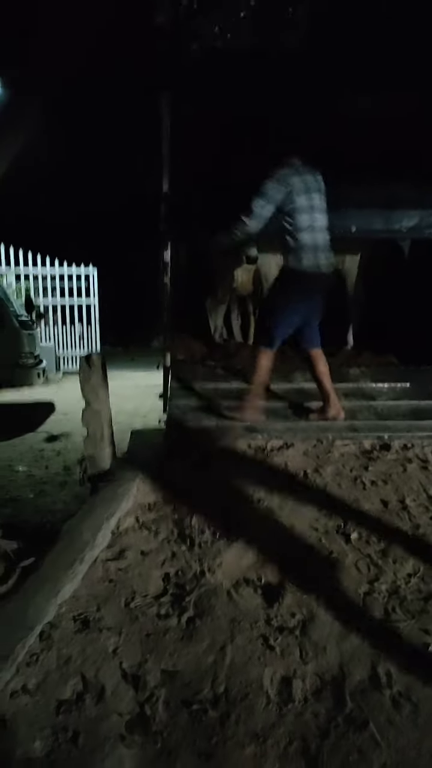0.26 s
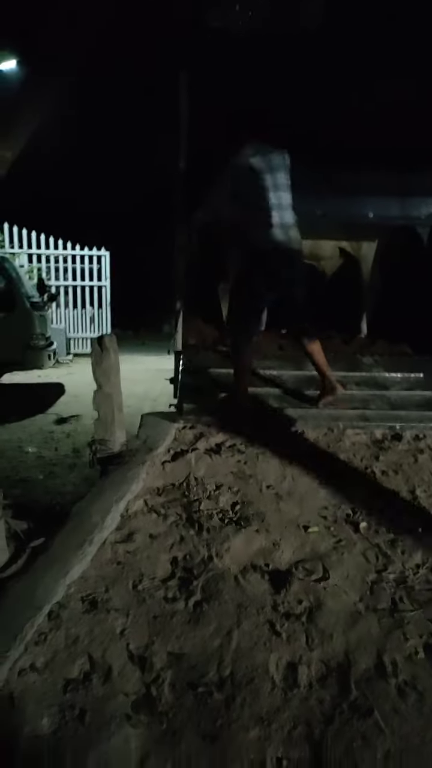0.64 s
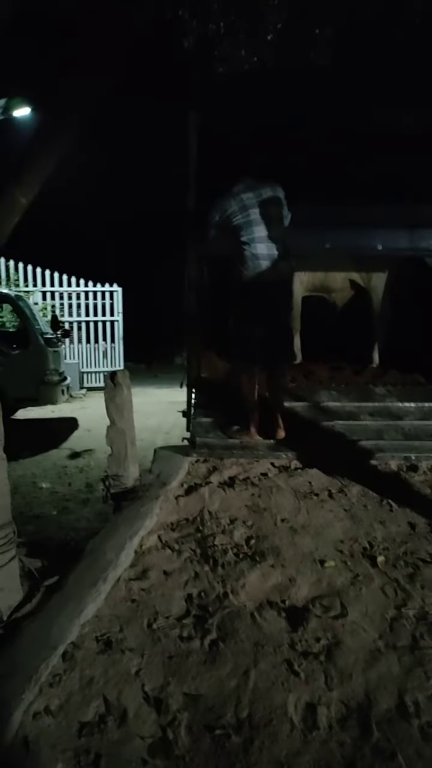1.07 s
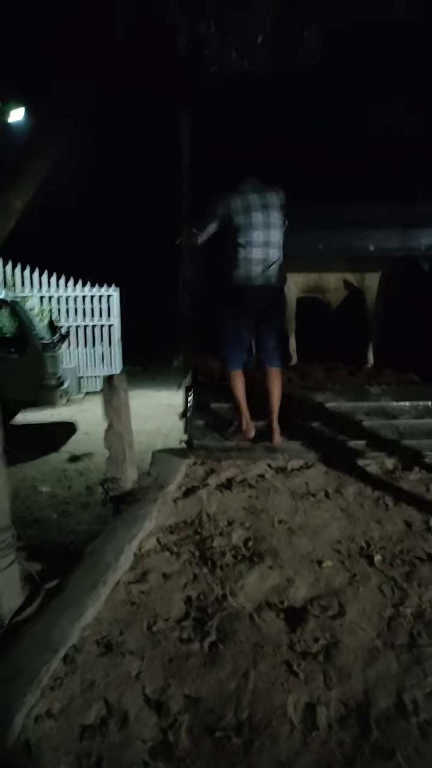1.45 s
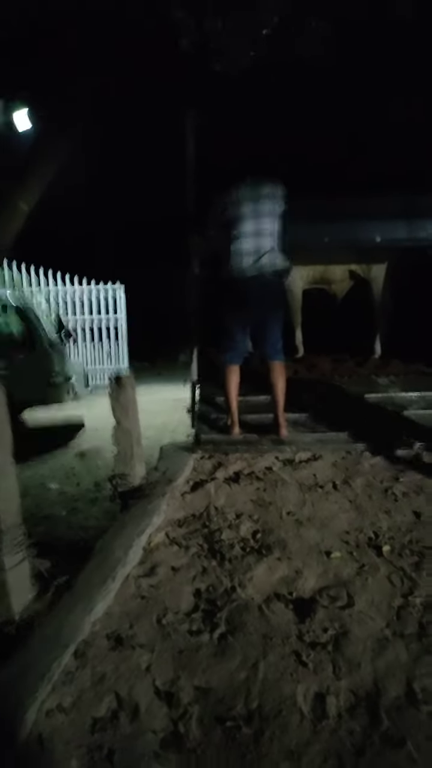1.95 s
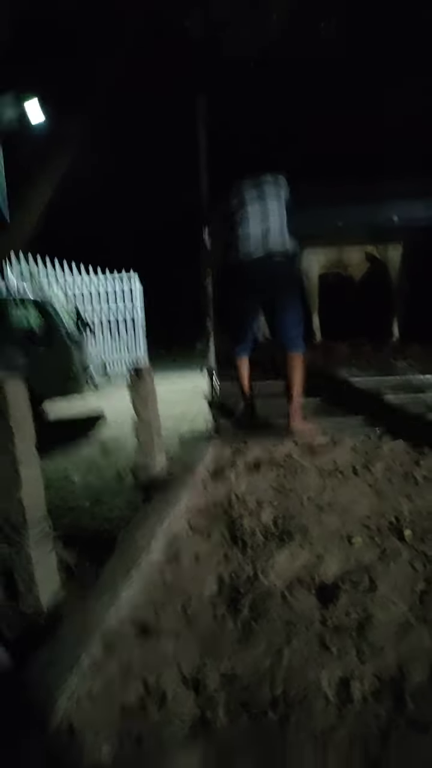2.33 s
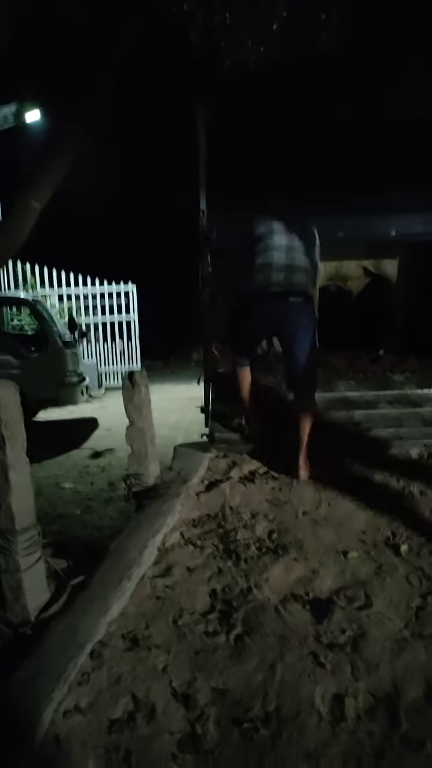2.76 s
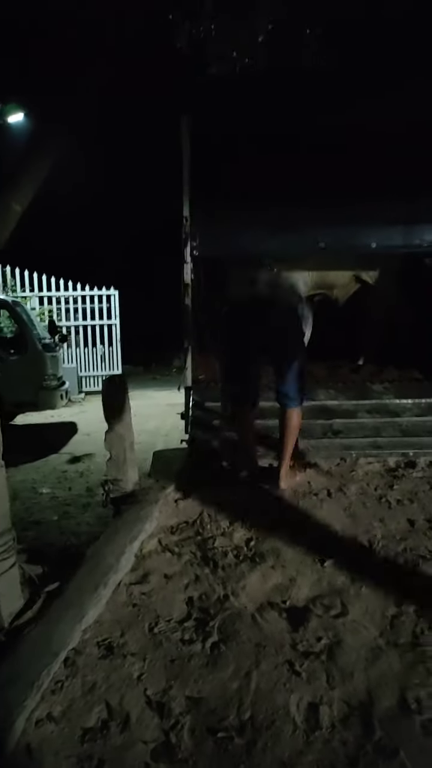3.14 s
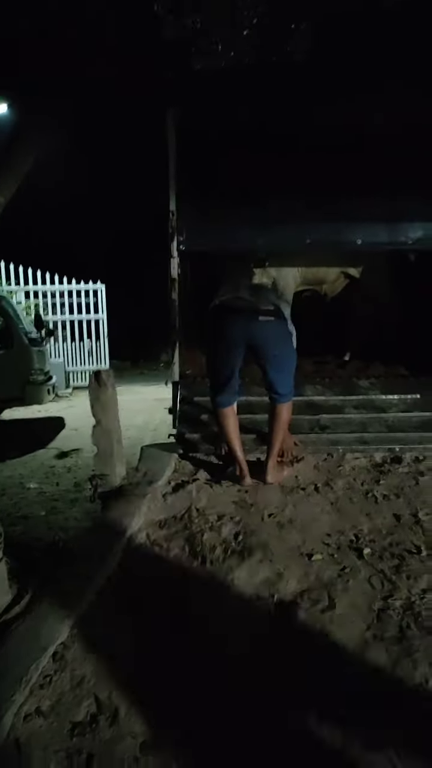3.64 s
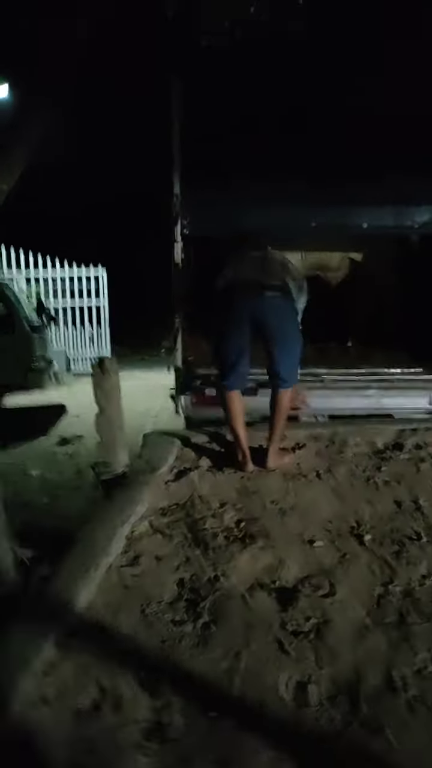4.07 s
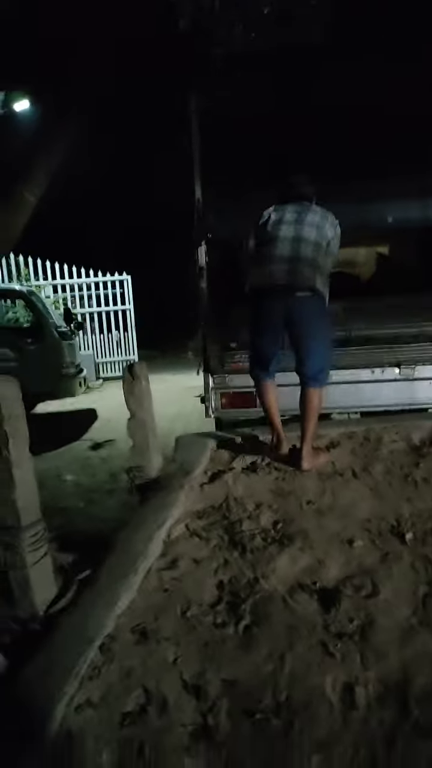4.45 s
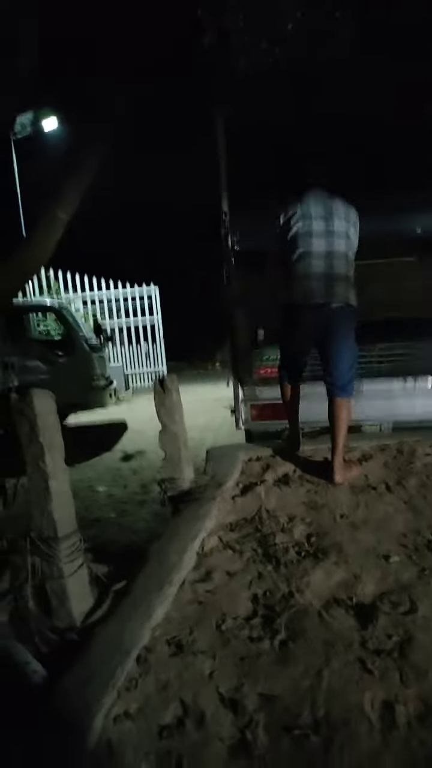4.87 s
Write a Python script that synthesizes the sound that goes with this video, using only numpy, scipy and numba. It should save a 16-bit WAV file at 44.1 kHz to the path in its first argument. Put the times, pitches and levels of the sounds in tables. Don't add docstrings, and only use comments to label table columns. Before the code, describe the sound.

A few metres away outdoors, hooves knock and drag on a truck's sheet-metal bed. Bangs at the ramp lead to a short squeak and two hard, ringing steel slams just before two seconds. The shaking dies away into sparse scuffs, a latch knock and a hollow thud, then loose bars rattle faster and brighter as the ramp rises. Faint engine hum; phone microphone with dull yard echo.

```python
import sys
import numpy as np
from scipy import signal
from scipy.fft import rfft, irfft
from scipy.io import wavfile
from scipy.ndimage import uniform_filter1d
from numba import njit

SR = 44100
rng = np.random.default_rng(int(sys.argv[2]) if len(sys.argv) > 2 else 0)


def magnitude_from_level(level_db):
    exponent = np.asarray(level_db, float) / 20
    return 10 ** exponent


def digitize_waveform(pressure):
    field = np.atleast_2d(pressure).T
    bounded = np.clip(field, -1, 1)
    quanta = np.round(bounded * 32767).astype(np.int16)
    wavfile.write(sys.argv[1], SR, quanta)


N = 225250
T = np.arange(N) / SR

# t/s, peak level/dB, ring t60/s, low ring share [0-3], clatter/s
BANGS = [
    (0.3855, -25.5, 0.21, 2.3, .004),
    (1.113, -28.5, 0.2, 2.9, 0.011),
    (3.7405, -36, 0.21, 0.66, .004),
    (1.7191, -16.5, 0.23, 1.34, 0.0019),
    (1.9125, -14.5, 0.26, 1.45, .004),
]
# f/Hz, share of ring time [0-3]
DECK_RING = [(300, 2.63), (900, 1.85), (2500, 0.74), (6000, 1.27), (13000, 1.05)]
BED_EVEN = 0.75


def on_log(table, hz):
    f, v = np.transpose(table)
    return np.interp(np.log(hz + 1e-9), np.log(f), v)


def coloured(gain):
    x = irfft(rfft(rng.standard_normal(N)) * gain, N)
    return x / np.std(x)


def walk(rate):
    k = int(SR / rate)
    levels = np.repeat(rng.standard_normal(N // k + 1), k)
    return 1.7 * uniform_filter1d(uniform_filter1d(levels, k), k)[:N]


@njit
def ring(hz, gain, t60, size):
    y = np.zeros(size)
    for k in range(len(hz)):
        p = np.exp(2j * np.pi * hz[k] / SR - np.log(1000.) / (t60[k] * SR))
        z = gain[k] + 0j
        for i in range(min(size, int(t60[k] * SR))):
            y[i] += z.imag
            z *= p
    return y


def add(out, x, s):
    i = int(s * SR)
    out[i:i + len(x)] += x[:N - i]


def strike(colour_db, t60, clatter_s, first, count=400):
    luck = rng.standard_normal((2, count))
    hz = 500 * (1 + 4.3 * (np.arange(count) + rng.random(count)) / count) ** 2
    gain = magnitude_from_level(colour_db(hz) + 5.5 * luck[0]) * hz ** .25 * np.exp(2j * np.pi * rng.random(count))
    modes = ring(hz, gain, np.clip(t60(hz) * np.exp(0.063 * luck[1]), .01, 1.2), SR)
    f, t, z = signal.stft(rng.standard_normal(SR), SR, nperseg=384)
    fade_db = colour_db(f)[:, None] - 60 * t / np.clip(t60(f), .01, 2)[:, None]
    dense = signal.istft(z * magnitude_from_level(fade_db), SR, nperseg=384)[1][:SR]
    start = SR // 40
    x = magnitude_from_level(-3.5) * modes / np.std(modes[:start]) + dense / np.std(dense[:start])
    t = T[:SR]
    crack = np.exp(-t / 0.019)
    x = x * magnitude_from_level(2.5 * crack + 1.78 * walk(210)[:SR] * (0.5 - crack))
    x = x * (1 - (1 - first) * np.exp(-t / clatter_s)) * np.minimum(t / 0.00032, 1)
    return x / np.std(x[:start])


def bangs():
    # f/Hz, level/dB per Hz
    ramp = [(180, -10), (300, -5), (370, -14), (591, -18), (914, -10.5), (1060, -13), (1220, -12),
            (2010, -11), (2530, -4), (3490, -4.5), (5660, -1), (7330, -12.5), (9180, -14.5), (11100, -28),
            (14200, -21)]
    sill = [(180, -11.5), (300, 5.5), (581, -31), (729, -11), (1020, -16), (1320, -40), (2150, 6.5),
            (2480, -8), (2690, 6.5), (5660, -1.5), (8890, -15), (9490, -24), (14200, -24)]
    latch = [(180, -36), (300, -7), (610, -29), (870, -13), (1410, -20), (1510, -9.5), (3430, -6),
             (4160, -6), (5480, -2), (10800, -15.5), (14200, -16)]
    gate = [(180, -44), (300, -18), (519, -29.5), (914, -12), (1200, -26.5), (1770, -1.5), (2330, -0.5),
            (2570, -6), (3320, -4), (4510, -15.5), (5140, -3), (5940, -9), (6340, -18.5), (7450, -12.5),
            (14200, -27.5)]
    rail = [(180, -29), (300, -16), (554, -31), (843, -2.5), (944, -8.5), (1020, -9.5), (1830, -6),
            (2330, -3), (3900, -8), (5220, -3.5), (5660, -5), (6230, -6.5), (9960, -12.5), (11000, -28.5),
            (14200, -9.5)]
    # f/Hz, level/dB, t60/s
    gate_modes = [(1736, 3, 0.11), (1920, -17, 0.3), (2290, -24, 0.1), (3270, -13, .14), (4890, -18, 0.26),
                  (4740, -3.5, 0.31), (5130, -2.5, .35), (5300, -28, 0.16), (5720, -7.5, 0.27),
                  (5240, -15, .1)]
    rail_modes = [(843, -14, 0.69), (1043, -15.5, 0.78), (2320, -7, 0.3), (3084, -0.5, 0.09),
                  (4630, -3, 0.23), (4780, -3, 0.26), (5820, 0, 0.25), (5860, -13, 0.28), (5980, -4, 0.25),
                  (6900, -9, 0.12), (7100, -6, .12)]
    sharp_s = .0045
    out = np.zeros(N)
    for (s, db, t60, low_share, clatter_s), part in zip(BANGS, (ramp, sill, latch, gate, rail)):
        colour_db = lambda hz: on_log(part, hz)
        lasts = lambda hz: t60 * on_log(DECK_RING, hz) * on_log([(900, low_share), (2500, 1.0)], hz)
        x = strike(colour_db, lasts, clatter_s, min(sharp_s / clatter_s, 1))
        add(out, magnitude_from_level(db - 6.0) * x, s)
    for bang, modes in zip(BANGS[-2:], (gate_modes, rail_modes)):
        hz, db, t60 = np.transpose(modes)
        gain = magnitude_from_level(db - 28) * np.exp(2j * np.pi * rng.random(len(hz)))
        add(out, ring(hz, gain, t60, SR), bang[0])
    return out


def on_deck(table, top_db, ring_s, clatter_s, first):
    # f/Hz, level/dB per Hz
    deck = [(180, -24.5), (300, -7), (563, -15.5), (706, -7), (1070, -8), (1320, -6.5), (2290, 4),
            (2920, -7), (5750, -5), (6340, -14), (14200, -42.5)]
    out = np.zeros(N)
    usual_db = np.mean([row[1] for row in table])
    top = top_db + 28.5
    for s, db, low, mid in table:
        t60 = ring_s + 0.02 * (db - usual_db)
        tilt = [(800, low + 13.5), (2300, mid - 4.5), (5500, 0), (11000, top), (13500, top + 12)]
        colour_db = lambda hz: on_log(deck, hz) + on_log(tilt, hz)
        lasts = lambda hz: t60 * on_log(DECK_RING, hz)
        add(out, magnitude_from_level(db - 9.5) * strike(colour_db, lasts, clatter_s, first), s)
    return out


def knocks():
    # t/s, peak level/dB, low body/dB, middle body/dB
    light_blows = [(0.096, -41.5, -2, 14), (0.1296, -40, -21, -9), (0.398, -37, -10.5, -3),
                   (0.7279, -34, -13, 3), (0.8365, -50.5, 6, 10), (0.9148, -46.5, -3, 6),
                   (1.0896, -37, -8.5, 2.5), (1.124, -34.5, -15.5, -3.5), (1.432, -42, -22, -15),
                   (2.7173, -43, -34, 8), (3.477, -46.5, -6.5, 5), (3.5003, -41.5, -40, -8),
                   (3.8295, -46, -44, -9), (4.4404, -45.5, 15, -10)]
    return on_deck(light_blows, top_db=-23.5, ring_s=.23, clatter_s=.004, first=.5)


def drags():
    # t/s, peak level/dB, low body/dB, middle body/dB
    dragged = [(0.0174, -46.5, -17, 4), (0.0503, -58, -17, -6), (0.152, -51.5, -20, -12),
               (1.1988, -45.5, 8, 12), (1.3257, -45, -10, -2), (1.3626, -44.5, -16, 5),
               (2.37, -45.5, -7, 4), (2.4395, -54, -11, -19), (2.706, -48, -21, 6), (2.78, -58, -20, 5),
               (2.9935, -45.5, -16, -3), (3.028, -49, -26, -1), (3.2997, -50, -16, 1.5),
               (3.9406, -54.5, -13, 6), (4.0647, -52, -10, 3), (4.1387, -51, 0, 14),
               (4.3166, -44, -7.5, 4.5)]
    return on_deck(dragged, top_db=-20.5, ring_s=0.35, clatter_s=.018, first=.1)


def rattles():
    # t/s, peak level/dB
    bars = [(4.5034, -48.5), (4.5535, -52.5), (4.572, -49), (4.64, -48), (4.6803, -66), (4.7284, -42),
            (4.8046, -37.5), (4.874, -37.5), (4.9626, -39.5), (4.9978, -39.5), (5.0563, -34.5)]
    table = [(s, db, -37, -13) for s, db in bars]
    return on_deck(table, top_db=-16, ring_s=0.14, clatter_s=.006, first=.3)


def thuds():
    # t/s, peak level/dB, f/Hz, t60/s
    frame = [(.39, -42, 384, 0.58), (.39, -53.5, 191, 1), (.735, -53.5, 336.2, 1), (1.118, -43, 353, 0.18),
             (1.15, -52.5, 252.3, 0.79), (1.725, -51, 281, 1), (1.92, -47, 326, 0.22),
             (2.03, -42, 197, 0.27), (2.722, -55, 2220, .12), (3.30, -50.5, 313, 0.06),
             (4.441, -39.5, 235.5, 0.18), (4.441, -47.5, 407, 0.042), (4.6, -60, 342, 0.8),
             (4.85, -60, 338.5, 1), (1.3, -53, 195.2, 0.55), (1.5, -54.5, 190, 0.4),
             (4.441, -40.5, 656, 0.09), (4.441, -49, 1490, 0.092)]
    # t/s, peak level/dB, f/Hz, t60/s
    grit = [(0.5602, -51, 5500, 0.027), (0.562, -55, 10500, .02), (2.3023, -36.5, 5270, 0.016),
            (3.741, -36, 13300, 0.03)]
    out = np.zeros(N)
    size = SR // 2
    for s, db, hz, t60 in list(frame) + list(grit):
        gain = magnitude_from_level(db) * np.array([1., 0.33 + 0j])
        x = ring(np.array([1., 1.04]) * hz, gain, np.full(2, max(t60, .005)), size)
        add(out, x * np.minimum(T[:size] * hz / 3.4, 1), s)
    return out


def hinge():
    # t/s, start pitch f/Hz, peak level/dB, octave relative level/dB, hold/s
    squeaks = [(1.499, 5500, -42, -10.5, 0.043), (1.653, 5100, -50.5, -24, 0.015)]
    attack_s, fade_db_per_s, octave_fade_db_per_s, sag_hz_per_s = 0.018, 298, 200, 860
    grip_hz, steady = 500, .95
    out = np.zeros(N)
    for s, hz, db, octave_db, hold_s in squeaks:
        t = np.maximum(T - s, 0)
        phase = 2 * np.pi * np.cumsum(hz - sag_hz_per_s * np.minimum(t, .5)) / SR
        level = db - fade_db_per_s * np.maximum(t - attack_s - hold_s, 0)
        rise = np.minimum(t / attack_s, 1) ** 2
        for order, shift_db in ((1, 0), (2, octave_db - octave_fade_db_per_s * t)):
            grip = steady + walk(grip_hz * order) + 1j * walk(grip_hz * order)
            out += magnitude_from_level(level + shift_db) * rise * (grip * np.exp(1j * order * phase)).real
    return out


def scrape():
    start_s, start_hz, climb_hz_per_s = 4.969, 2030, 2600
    peak_db, rise_s, fade_db_per_s = -56, 0.066, 63
    t = T - start_s
    phase = 2 * np.pi * np.cumsum(start_hz + climb_hz_per_s * np.maximum(t, -.5)) / SR
    grind = (walk(500) + 1j * walk(500)) * magnitude_from_level(1.7 * walk(40)) * np.exp(1j * phase)
    rise = np.exp(-(np.minimum(t, 0) / rise_s) ** 2)
    return magnitude_from_level(peak_db - fade_db_per_s * np.maximum(t, 0)) * rise * grind.real


def yard(x):
    t60_s, echo_db, damp_hz, delay_s = 0.93, -22, 5000, 0.027
    t = T[:SR]
    tail = rng.standard_normal(SR) * magnitude_from_level(-60 * t / t60_s) * (1 - np.exp(-t / delay_s))
    tail = signal.lfilter(*signal.butter(1, damp_hz, fs=SR), tail)
    return magnitude_from_level(echo_db) * signal.fftconvolve(x, tail / np.sqrt(np.sum(tail ** 2)))[:N]


def shudder(t60, even):
    out = np.zeros(N)
    loudest_db = max(row[1] for row in BANGS)
    rise = 1 - np.exp(-T / 0.061)
    for s, db, *_ in BANGS:
        add(out, magnitude_from_level(even * (db - loudest_db) - 60 * T / t60) * rise, s)
    return out


def night():
    # f/Hz, level/dB per Hz
    ground = [(59, -47), (100, -14), (127, 4.5), (155, -4.5), (246, 0), (649, -9), (724, -7.5),
              (794, -10.5), (2180, -9), (3200, -14), (5440, -8), (8000, -19), (10400, -19), (17600, -120)]
    treble = [(9500, -23), (10800, -33), (12000, -32.5), (14000, -26.5)]
    # t/s, level/dB
    stir = [(0, -54.5), (.23, -56.5), (.55, -54), (.73, -54), (.95, -59.5), (1.2, -52), (1.4, -55.5),
            (1.7, -43.5), (2.15, -56), (2.5, -62), (2.9, -59), (3.5, -59), (4.0, -58.5), (4.3, -55),
            (4.8, -55.5), (5.11, -55)]
    # rest level/dB, share of stir [0-1], shudder level/dB, shudder t60/s, ramp jingle level/dB
    regions = [
        (-4, 0.57, 13.5, 1.38, -7),
        (-1.5, 0.54, 22.5, 0.73, -16),
        (-2, 0.62, 21, 0.79, 15.5),
        (1, .5, 28, 0.66, 20.5),
    ]
    stir_db = np.interp(T, *np.transpose(stir)) + 57
    lift_db = 30.5 * (T - T[-1])
    swell = []
    for (rest_db, share, db, t60, jingle_db), even in zip(regions, (BED_EVEN, 1, 1, 1)):
        scuff = magnitude_from_level(rest_db + share * stir_db)
        shake = magnitude_from_level(db) * shudder(t60, even)
        jingle = magnitude_from_level(jingle_db + lift_db)
        swell.append(10 * np.log10(scuff ** 2 + shake ** 2 + jingle ** 2))
    f = np.fft.rfftfreq(N, 1 / SR)
    colour = magnitude_from_level(on_log(ground[:-2] + treble, f))
    colour /= np.sqrt(np.sum(colour[f > 90] ** 2))
    grit = walk(90)
    out = np.zeros(N)
    edges = np.geomspace(90, 15000, 30)
    for a, b in zip(edges, edges[1:]):
        gain = colour * (f >= a) * (f < b)
        place = np.interp(np.log(a), np.log([500, 1300, 2200, 4500, 6000, 9000]), [0, 1, 1, 2, 2, 3])
        weight = np.clip(1 - abs(place - np.arange(4)), 0, 1)
        db = weight @ np.array(swell) + 1.56 * walk(42) + grit * (1 - weight[0])
        out += np.sqrt(np.sum(gain ** 2)) * coloured(gain) * magnitude_from_level(db)
    return magnitude_from_level(-57.5) * out


def engine():
    # t/s, level/dB
    hum_levels = [(0.0, -62), (0.1, -98), (0.33, -57), (0.64, -62.5), (0.71, -83), (0.77, -71), (1.73, -76),
                  (1.75, -69), (3.39, -65), (3.68, -54), (4.15, -71), (4.21, -56.5), (4.92, -56),
                  (5.11, -61)]
    hum_hz, width_hz = 64, 6.7
    bass_db, bass_share, shake_db = -63, 0.15, -72
    hum_db = np.interp(T, *np.transpose(hum_levels))
    f = np.fft.rfftfreq(N, 1 / SR)
    hum = coloured(1 / (1 + ((f - hum_hz) / width_hz) ** 2))
    bass = coloured(f ** 2 / (f ** 2 + 30 ** 2) / (1 + (f / 120) ** 4))
    load = magnitude_from_level(bass_db + bass_share * (hum_db - np.median(hum_db)))
    shake = magnitude_from_level(shake_db) * shudder(0.61, BED_EVEN)
    return hum * magnitude_from_level(hum_db - 0.5) + bass * np.hypot(load, shake)


def scene():
    truck = bangs() + knocks() + drags() + rattles() + thuds() + hinge() + scrape()
    return (truck + yard(truck) + night() + engine())[None]


def low_pass(x):
    return signal.sosfilt(signal.butter(12, 15260, fs=SR, output="sos"), x)


def record(dry):
    port_hz, port_width_hz, port_lift, limit, top_hz = 5710, 410, 0.63, 0.53, 14050
    port = dry + port_lift * signal.lfilter(*signal.iirpeak(port_hz, port_hz / port_width_hz, fs=SR), dry)
    rounded = limit * np.tanh(port / limit)
    cut = signal.sosfilt(signal.ellip(10, .3, 70, top_hz, fs=SR, output="sos"), rounded)
    return low_pass(cut)


dry = scene()
out = record(dry)
digitize_waveform(out)
```